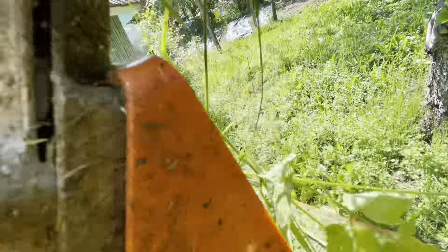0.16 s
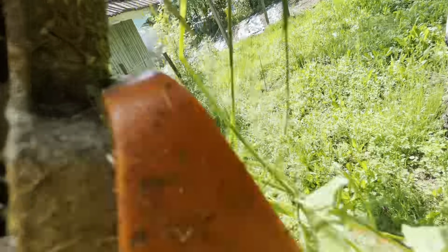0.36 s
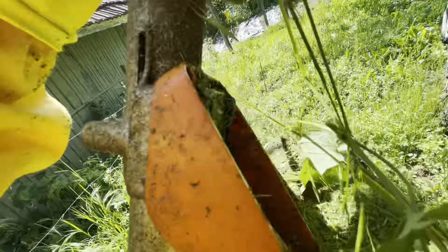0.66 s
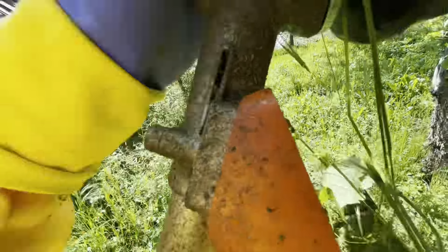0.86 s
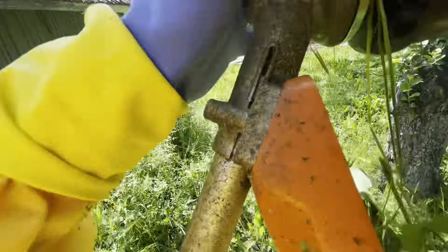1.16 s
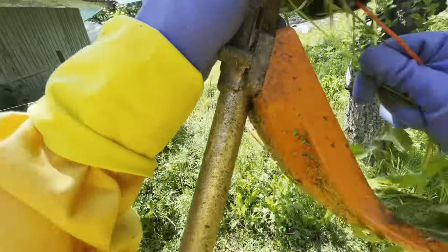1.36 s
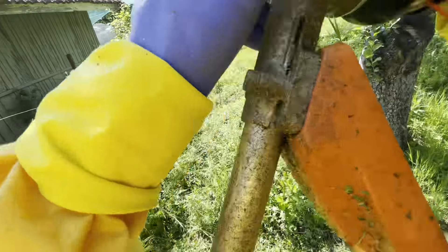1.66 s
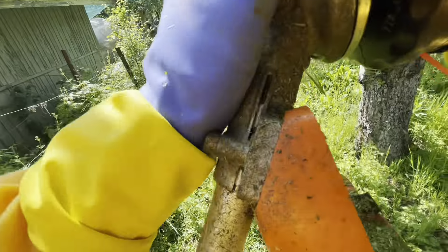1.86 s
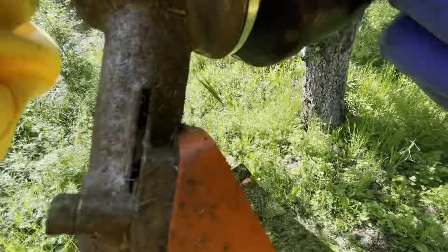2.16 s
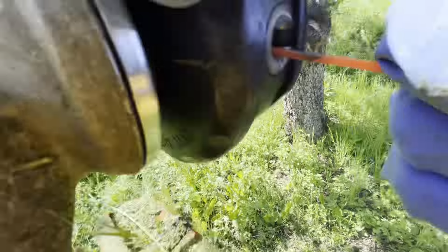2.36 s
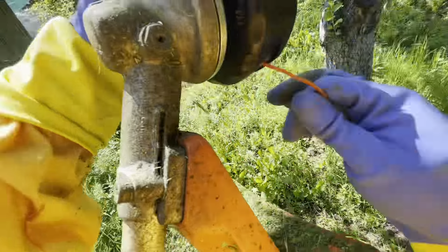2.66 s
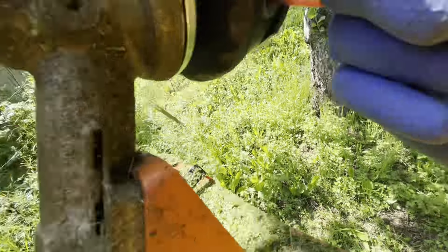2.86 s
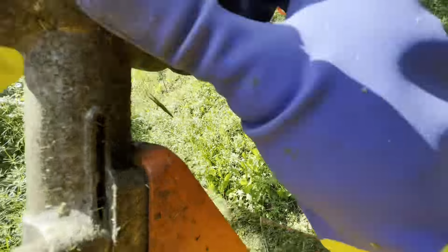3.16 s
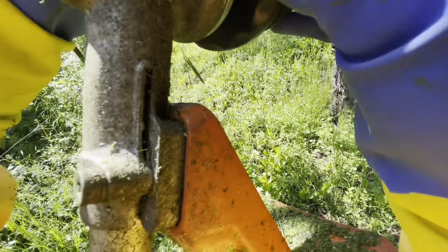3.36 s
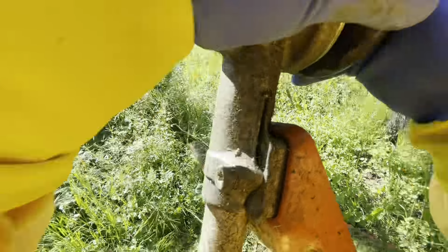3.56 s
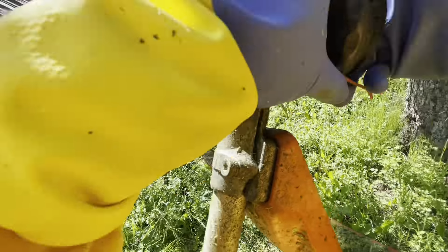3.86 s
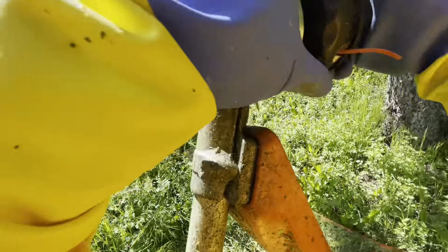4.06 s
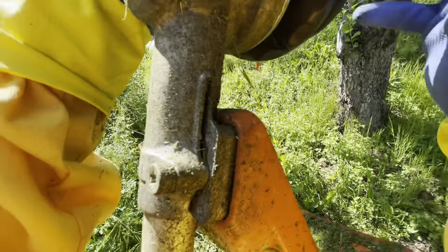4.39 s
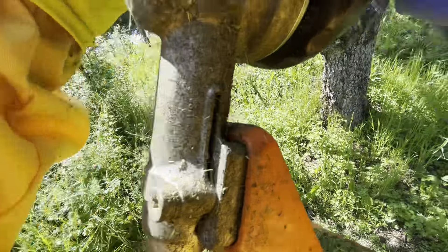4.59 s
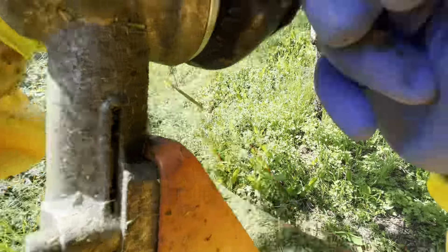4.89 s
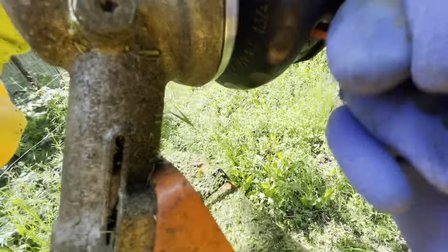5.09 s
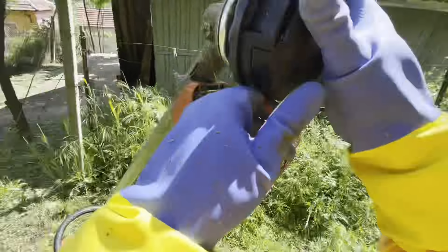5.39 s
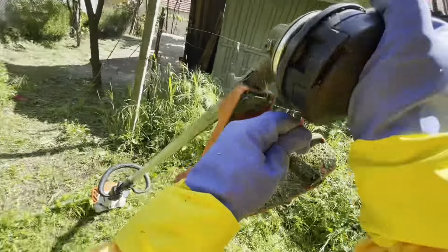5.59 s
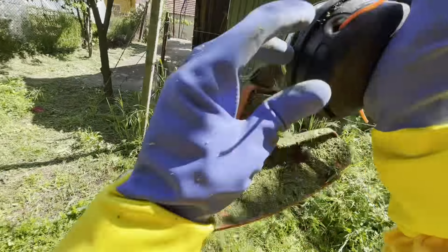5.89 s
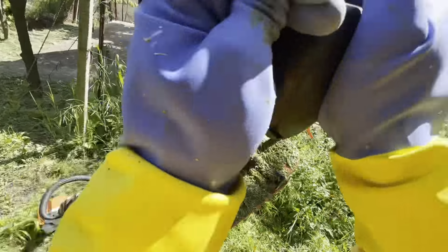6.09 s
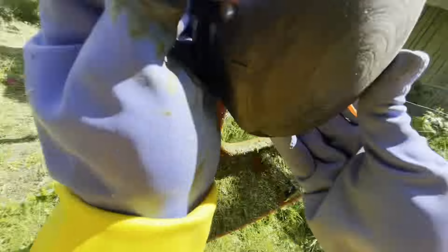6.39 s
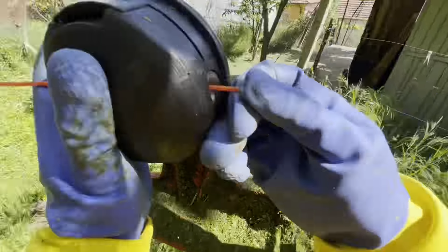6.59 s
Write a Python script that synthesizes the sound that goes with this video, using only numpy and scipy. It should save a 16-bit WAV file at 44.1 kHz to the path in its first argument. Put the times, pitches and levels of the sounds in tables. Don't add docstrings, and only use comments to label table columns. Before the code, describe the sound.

A bee buzzes continuously against the cloth of a suit, rough and raspy up close, while rubber gloves snap and tick in a quiet garden.

```python
import sys
import numpy as np
from scipy import signal
from scipy.fft import rfft, irfft, next_fast_len
from scipy.io import wavfile
from scipy.ndimage import uniform_filter1d

SR = 44100
rng = np.random.default_rng(int(sys.argv[2]) if len(sys.argv) > 2 else 0)


def transcribe(u):
    v = np.clip(np.atleast_2d(u).T, -1, 1)
    q = np.round(v * 32767).astype(np.int16)
    wavfile.write(sys.argv[1], SR, q)


def how_loud(loudness_db):
    steps = np.asarray(loudness_db, float) / 20
    return 10 ** steps


N = 297145

# freq_hz, density_db
HISS_SPECTRUM = [(30, 14), (70, 12), (120, 8), (200, -8), (1000, -8), (3000, -7), (4200, -3), (5200, -5),
                 (8000, -4), (10000, -2), (13000, 0), (15000, -1), (15850, -3), (16000, -45)]
# start_s, end_s, level_db
SLEEVE_RUSTLES = [(-.1, .22, -63), (.6, .75, -58), (.9, 1.38, -63), (1.62, 2.02, -63), (2.15, 2.62, -62.5),
                  (2.82, 3.08, -63), (3.3, 3.68, -62.5), (3.97, 4.03, -63), (4.45, 4.55, -64),
                  (5.0, 5.26, -62), (5.59, 5.65, -62), (5.83, 5.95, -62), (6.2, 6.9, -60)]
# start_s, end_s, level_db
INSECT_SONGS = [
    (.55, 1.15, -71),
    (1.25, 1.8, -72.5),
    (2.05, 3.05, -76),
    (3.45, 5.1, -73.5),
    (5.35, 5.85, -67.5),
    (5.85, 6.66, -64.5),
]
# start_s, peak_db, ring_hz, t60_s
HAND_BUMPS = [(6.6, -37, 1138, .1), (6.606, -38, 1380, .08), (6.612, -39, 2257, .1),
              (6.622, -39, 1180, .07), (6.635, -39, 1300, .08), (6.65, -40, 1900, .06),
              (6.686, -43, 6000, .02), (6.692, -31, 2070, .05), (6.696, -33, 2400, .04),
              (6.693, -36, 1503, .04), (6.694, -41, 4800, .02), (6.696, -43, 6600, .02),
              (6.695, -29, 417, .034), (6.699, -31, 930, .05), (6.704, -35, 430, .04)]
# start_s, peak_db, centre_hz, body_db, left_minus_right_db
GLOVE_SNAPS = [
    (1.7729, -18.5, 9275, -9, -3),
    (1.8658, -20.5, 8840, -12, -4),
    (3.5845, -19, 10500, -4, 0),
    (3.8164, -17, 9680, -4, -3.5),
    (4.0081, -17.5, 9690, -3, -3.5),
]
# start_s, peak_db, centre_hz, left_minus_right_db
RUBBER_CRACKLE = [(0.429, -38.5, 5930, 19), (0.6597, -33, 9000, 7), (0.6882, -47, 7520, -32.5),
                  (0.969, -32, 8650, 8), (0.9753, -26, 10800, -2.5), (1.0257, -27.5, 10500, 9.5),
                  (1.068, -44.5, 10400, -25.5), (1.073, -25, 11300, 7.5), (1.119, -25.5, 6800, -2),
                  (1.1485, -35.5, 9370, -12.5), (1.1508, -26.5, 10600, 3)]
# start_s, peak_db, centre_hz
SIDE_TICKS = [(0.045, -44, 6140), (0.631, -37, 12300), (2.4, -38, 6270), (3.3631, -48.5, 6140),
              (5.187, -35.5, 12300), (5.3484, -55, 11150), (5.3623, -37.5, 10500), (5.616, -36, 11500),
              (5.653, -46, 12200), (5.6994, -35, 11500), (6.5182, -39, 12100), (1.099, -60, 10460),
              (2.3303, -42, 6555), (2.381, -36.5, 6450), (2.432, -31, 8600), (3.008, -43, 6800),
              (3.0109, -33, 7900), (3.276, -36, 11800), (4.5359, -42, 7850), (4.713, -35, 6570),
              (5.026, -35.5, 6460), (5.0643, -40.5, 6700), (5.106, -32, 6500), (6.207, -35.5, 12100),
              (6.368, -38, 12370)]
# start_s, peak_db, centre_hz
GLOVE_SLIPS = [
    (1.7677, -35, 9300),
    (1.8625, -35, 9100),
    (3.5885, -37, 8500),
]
# time_s, beat_hz
WING_BEAT = [(0, 255.7), (.11, 255.9), (.3, 266), (.56, 237.3), (.8, 255), (1.3, 244.8), (1.58, 263.6),
             (1.95, 258.4), (2.25, 248.7), (2.58, 255.9), (2.95, 262.2), (3.24, 241.3), (3.45, 256.4),
             (4.2, 250.2), (4.4, 256), (5.4, 246.3), (5.68, 250.2), (6.74, 252.3)]
# time_s, drop_hz
BEAT_FALTERS = [(1.122, 7), (1.642, 11.1), (1.822, 15.6), (2.078, 7.3), (2.392, 9.1), (2.681, 7.6),
                (3.202, 5.2), (3.499, 5.8), (3.688, 15.3), (3.879, 8.7), (4.241, 4.97), (4.368, 3.85),
                (4.501, 5.1), (4.672, 10.8), (4.868, 5.2), (5.031, 5.4), (5.172, 5.7), (5.76, 7.1),
                (5.85, 8), (5.93, 3), (6.05, 3.5), (6.11, 5), (6.17, 9), (6.352, 10), (6.41, 3), (6.47, 9),
                (6.56, 6), (6.63, 4.1), (6.7, 2.6)]
# multiple, level_db
WING_TONES = [(2, 7.5), (3, 1.5), (4, 5), (5, 3), (6, -3.5), (7, -0.5)]
# time_s, level_db, left_minus_right_db
BEE_FACING = [(0, -59.5, -1), (.3, -51.5, -3), (.6, -46.5, -8), (.9, -52, -8), (1.35, -56, 5),
              (1.55, -59, 10), (1.97, -51.5, -12), (2.21, -57, 3), (2.45, -52.5, 3), (2.68, -61, -3),
              (3.0, -50, 3), (3.2, -60, 2), (4.05, -60.5, 2.5), (4.6, -60, -0.5), (5.05, -54.5, 5),
              (5.8, -64.5, -3.5), (6.25, -53.5, 4), (6.74, -57.5, 0)]
# time_s, slap_brightness_db, left_minus_right_db
CLOTH_PRESS = [(0, -46, 0), (.4, -47, 0.5), (.62, -49.5, -1), (1.8, -50, 1.5), (2.1, -50, -0.5),
               (3.1, -48.5, 2), (5.2, -49, 0.5), (5.44, -47, 5), (6.5, -45.5, 3.5), (6.74, -43, 5.5)]
# time_s, slack_share
CLOTH_SLACK = [(0, 0), (.45, 0), (.55, 0.05), (5.2, 0.05), (5.4, 0.95), (6.74, 0.95)]
# centre_hz, width_hz, level_db
DULL_MODES = [(412, 75.6, 1), (674, 51, 0), (1004, 360, -7.5)]
# centre_hz, width_hz, level_db
MIDDLE_MODES = [(1246, 450, -0.5), (1377, 226, 6)]
# centre_hz, width_hz, level_db
BRIGHT_MODES_TAUT = [(1755, 160, -3.5), (1974, 87, 6), (2268, 150, 6), (2510, 144, -4), (3120, 220, -5),
                     (3610, 170, -13), (4630, 310, -24.5)]
# centre_hz, width_hz, level_db
BRIGHT_MODES_SLACK = [(1650, 220, -18), (1880, 88, 5), (2140, 120, 11), (2370, 260, -1), (2660, 60, -4),
                      (3250, 130, -9), (3470, 120, -14), (4070, 130, -21)]
# start_s, end_s, level_db
SEAM_PINGS = [
    (-.1, .4, -67),
    (.4, .7, -63.5),
    (.7, 2.02, -69),
    (2.14, 2.8, -68),
    (2.8, 3.25, -65.5),
    (3.25, 4.9, -71),
    (4.9, 5.28, -67),
    (6.66, 6.9, -76),
]
# freq_hz, half_lead_x2_rad
PORT_LEAD = [(0, 0), (500, .3), (1500, .45), (2000, .8), (2900, .8), (3600, 2.4), (4500, 3.1), (6200, 2.1),
             (9000, .9), (13000, 1.5)]
# freq_hz, taut_share, slack_share
GATE_SHARES = [(3200, 0, 0), (3800, .25, .02), (4600, .6, .1), (5400, .15, .4), (6300, .03, .15),
               (7500, .3, .2), (8800, .4, .62), (10800, .08, .5), (11800, .02, .03), (13200, .12, .1),
               (14500, .03, .02), (15600, .2, .15)]


def evened(x):
    return x / np.sqrt(np.mean(x ** 2) + 1e-20)


def curves(rows):
    s, *columns = np.transpose(rows)
    return [np.interp(np.arange(N) / SR, s, c) for c in columns]


def read(points, hz):
    f, value = np.transpose(points)
    return np.interp(np.log(hz + 1), np.log(f + 1), value)


def ring(x, hz, width_hz):
    pole = np.exp((2j * np.pi * hz - np.pi * width_hz) / SR)
    return 2 * signal.lfilter([1 - abs(pole)], [1, -pole], x).real


def dulled(x, hz):
    return signal.sosfilt(signal.butter(3, hz, fs=SR, output="sos"), x)


def thinned(x, hz, order=3):
    return signal.sosfilt(signal.butter(order, hz, "high", fs=SR, output="sos"), x)


def drift(size):
    return evened(uniform_filter1d(uniform_filter1d(rng.standard_normal(N), size), size))


def spells(rows, edge_s, rest_db):
    t = np.arange(N) / SR
    power = how_loud(2 * rest_db)
    for start_s, end_s, db in rows:
        swell = (np.tanh((t - start_s) / edge_s) - np.tanh((t - end_s) / edge_s)) / 2
        power = power + how_loud(2 * db) * swell
    return np.sqrt(power)


def add(mix, s, sound):
    part = mix[:, round(s * SR):][:, :sound.shape[1]]
    part += sound[:, :part.shape[1]]


def ports(x, pan_db):
    size = next_fast_len(len(x))
    half = np.exp(.5j * read(PORT_LEAD, np.fft.rfftfreq(size, 1 / SR)))
    pair = irfft(rfft(x, size) * np.array([half, 1 / half]), size)[:, :len(x)]
    return pair * how_loud(np.array([pan_db / 2, -pan_db / 2]).reshape(2, -1))


def garden_hiss():
    frames, hz = N // 128 + 5, np.fft.rfftfreq(512, 1 / SR)
    a, b, c, d, patches = rng.standard_normal((frames, 257, 5)).T
    patches = evened(uniform_filter1d(uniform_filter1d(patches, 10, 0), 25, 1))
    left = a + 1j * b
    right = c + 1j * d - 0.16 * left
    z = np.array([left, right]) * how_loud(read(HISS_SPECTRUM, hz)[:, None] + 1.7 * patches)
    hiss = evened(signal.istft(z, nperseg=512, noverlap=384)[1][:, :N])
    return how_loud(0.5) * hiss * spells(SLEEVE_RUSTLES, edge_s=0.061, rest_db=-60)


def far_insect():
    whistle = ring(ring(rng.standard_normal(N), 12260, 300), 12260, 450)
    fuzz_db = 2.5 * drift(size=200)
    throb_hz = 80 + 8 * drift(size=2000)
    throb_db = 4.5 * np.sin(2 * np.pi * np.cumsum(throb_hz) / SR)
    song = evened(whistle * how_loud(fuzz_db + throb_db))
    song = how_loud(6.5) * spells(INSECT_SONGS, edge_s=0.036, rest_db=-94) * song
    faint = ring(ring(rng.standard_normal(N), 10450, 110), 10450, 180)
    return ports(song + how_loud(-76) * evened(faint), 4.5)


def bumps():
    out, t = np.zeros((2, N)), np.arange(6000) / SR
    for s, db, hz, t60_s in HAND_BUMPS:
        blow = how_loud(-60 * t / t60_s) * np.sin(2 * np.pi * hz * t) * (1 - np.exp(-t / 0.000083))
        scuff = 2.0 * np.exp(-t / 0.0023) * ring(rng.standard_normal(6000), 0.2 * hz, 1500)
        push = 0.068 * np.exp(-t / 0.0097) * np.sin(2 * np.pi * 45 * t)
        add(out, s, how_loud(db) * ports(blow + scuff + push, 8.2))
    return out


def gloves():
    out, t = np.zeros((2, N)), np.arange(2000) / SR
    crackle_body_db, tick_body_db, tick_pan_db = 1, 2, 10
    rows = list(GLOVE_SNAPS)
    rows += [(s, db, hz, crackle_body_db, pan_db) for s, db, hz, pan_db in RUBBER_CRACKLE]
    rows += [(*tick, tick_body_db, tick_pan_db) for tick in list(SIDE_TICKS) + list(GLOVE_SLIPS)]
    rise_or_fall_s = np.where(t < .0007, .0002, .0006)
    tail = .05 * (t > .0011) * np.exp(-t / .007)
    shape = np.exp(-((t - .0007) / rise_or_fall_s) ** 2) + tail
    clean_break = 3.0 * (np.arange(2000) == 36)
    push = .04 * np.exp(-t / .006) * np.sin(2 * np.pi * 70 * t)
    for s, db, hz, body_db, pan_db in rows:
        crackle = rng.choice([-1., 1.], 2000)
        burst = np.diff(shape * (crackle + clean_break), prepend=0)
        bright = ring(ring(ring(burst, hz, 4000), hz, 4500), hz, 7000)
        bright += 2.2 * ring(ring(burst, 4600, 3000), 4800, 3500)
        body = ring(ring(np.roll(burst, 26), 1900, 1500), 3500, 2800)
        snap = bright / (0.38 * np.linalg.norm(bright)) + how_loud(body_db) * body / abs(body).max() + push
        add(out, s - .0005, how_loud(db) * ports(snap, pan_db))
    return out


def slackness():
    return np.clip(curves(CLOTH_SLACK)[0], 0, 1)


def modes(x, table, sign):
    slack = slackness()
    out = np.zeros(N)
    for k, (hz, width_hz, db) in enumerate(table):
        both = ring(x * (1 - slack), hz, width_hz) + ring(x * slack, 0.988 * hz, width_hz)
        out += sign ** k * how_loud(db) * both
    return evened(out)


def bright_rings(x):
    slack = slackness()
    out = np.zeros(N)
    for table, share in ((BRIGHT_MODES_TAUT, 1 - slack), (BRIGHT_MODES_SLACK, slack)):
        for hz, width_hz, db in table:
            out += how_loud(db) * ring(x * share, hz, width_hz)
    return evened(out)


def hollow(x):
    t = np.arange(800) / SR
    taps = rng.standard_normal((2, 800)) * np.exp(-t / 0.0049) * (t > .0008)
    taps /= np.linalg.norm(taps, axis=1, keepdims=True)
    return how_loud(-8.5) * signal.oaconvolve(x[None], taps, axes=1)[:, :N]


def wing_hz():
    t = np.arange(N) / SR
    hz = curves(WING_BEAT)[0]
    falter_s, pickup_s = .015, .05
    for s, drop_hz in BEAT_FALTERS:
        hz = hz - drop_hz * np.exp(-((t - s) / np.where(t < s, falter_s, pickup_s)) ** 2)
    return hz


def slaps(turns, sway, place, sharp, late, scatter, steady):
    chance = rng.standard_normal((len(sway), 2))
    stroke = np.arange(len(sway)) + place
    samples = np.arange(N)
    at = np.interp(stroke + late * np.sin(sway) + scatter * chance[:, 0], turns, samples)
    force = np.exp(sharp * np.cos(sway) + 0.072 * chance[:, 1])
    usual_at = np.interp(stroke, turns, samples)
    usual = np.full_like(force, (1 - steady) * force.mean())
    out = np.zeros(N + 1)
    for where, size in ((at, -force), (usual_at, usual)):
        whole = where.astype(int)
        out += np.bincount(whole, size * (1 - where % 1), N + 1)
        out += np.bincount(whole + 1, size * (where % 1), N + 1)
    out[-3:] = 0
    return out[:N]


def wing_whirr(turns, level_db):
    noise = (.3 + np.exp(-((turns - .55) % 1) / .2)) * rng.standard_normal((2, N))
    whirr = ring(noise, 2500, 880) + 1.8 * ring(noise, 3320, 1600)
    whirr += 2.7 * ring(noise, 270, 120)
    return how_loud(level_db) * evened(dulled(whirr, 5060))


def seam_pings(turns, sway):
    hits = how_loud(1.5 * drift(size=1500)) * slaps(turns, sway, .56, 1.15, 0.04, .01, 0.99)
    hits = hits + .25 * np.roll(hits, 86)
    ping = evened(ring(ring(hits, 6120, 800), 6050, 1600))
    return how_loud(8.0) * spells(SEAM_PINGS, edge_s=0.11, rest_db=-103) * ping


def crisp_slaps(turns, sway, bright_db):
    taps = slaps(turns, sway, .54, 0.55, 0.025, 0.004, 1.0)
    spike = ring(ring(np.diff(taps, prepend=0), 2200, 2600), 2600, 3600)
    brushed = taps + 0.45 * np.roll(taps, 74)
    sound = bright_rings(brushed) + how_loud(-13) * evened(spike)
    return how_loud(bright_db + 1.5) * dulled(thinned(sound, 1230), 5700)


def soft_slaps(turns, sway, bright_db):
    dull = slaps(turns, sway - .3, .6, 1.1, 0.0012, 0.045, 0.0021)
    full = slaps(turns, sway - 2.5, 0.555, 1.9, 0.041, 0.0083, 0.067)
    full_db = -6.5 + 1.25 * (bright_db + 47.5)
    return how_loud(full_db) * modes(full, MIDDLE_MODES, -1.07) - how_loud(-7.5) * modes(dull, DULL_MODES, -0.76)


def wing_tones(turns, low_db):
    out = np.zeros(N)
    for k, db in WING_TONES:
        swell_db = (k == 2) * 0.28 * (low_db + 38.5)
        out -= how_loud(db + swell_db) * np.sin(2 * np.pi * k * (turns - .84))
    return how_loud(-11) * out


def lowest_tone(turns, low_db, pan_db):
    wander = .6 * drift(size=8000)
    phase = 2 * np.pi * turns + np.array([wander, -wander]) + 2.0
    return how_loud(low_db + 5.5 + np.array([pan_db, -pan_db]) / 2) * np.sin(phase)


def bee():
    (bright_db, pan_db), (low_db, low_pan_db), hum_db = curves(CLOTH_PRESS), curves(BEE_FACING), -40.5
    unsteady = 1 + .009 * drift(size=350) + .007 * drift(size=1600)
    turns = np.cumsum(wing_hz() * unsteady) / SR
    sway = 2 * np.pi * np.cumsum(.33 + .11 * rng.standard_normal(1800))
    hum = how_loud(hum_db) * (wing_tones(turns, low_db) + soft_slaps(turns, sway, bright_db))
    sound = ports(hum + crisp_slaps(turns, sway, bright_db), pan_db)
    sound = thinned(sound, 230, order=4)
    sound = sound + hollow(sound.mean(0))
    sound += ports(seam_pings(turns, sway), pan_db + 8.0)
    sound += lowest_tone(turns, low_db, low_pan_db)
    return sound + wing_whirr(turns, hum_db - 14)


def scene():
    return garden_hiss() + far_insect() + bumps() + gloves() + bee()


def wind_filter(x):
    return thinned(x, 215, order=6) + .04 * x


def gain_control(x):
    peak_db = 20 * np.log10(abs(x).max(0) + 1e-9)
    fall_db = np.arange(N) * 710.0 / SR
    over_db = np.maximum(np.maximum.accumulate(peak_db + fall_db) - fall_db + 28.0, 0)
    duck_db = .5 * np.roll(uniform_filter1d(over_db, 40), 100)
    return x / how_loud(duck_db)


def gate(x):
    slackens_s, thin_hz, thin_share = 5.27, 3000, .75
    hz, t, z = signal.stft([x[0] + x[1], x[0] - x[1]], SR, "cosine", nperseg=2048, noverlap=1024)
    power = abs(z) ** 2
    share = power[0, :1024].reshape(64, 16, -1).mean(1) / power[0].mean(0) ** .32
    share = uniform_filter1d(uniform_filter1d(np.log(share + 1e-30), size=3, axis=0), size=2, axis=1)
    rank = (share - uniform_filter1d(share, size=90, axis=1)).argsort(1).argsort(1) / share.shape[1]
    f, taut, slack = np.transpose(GATE_SHARES)
    taut_limit, slack_limit = [np.interp(hz[8::16], f, c)[:, None] for c in (taut, slack)]
    limit = np.where(t < slackens_s, taut_limit, slack_limit)
    treble = power[0, 300:700].mean(0)
    sudden = treble > 3.5 * np.median(treble)
    z[0, :1024] *= np.repeat((rank >= limit) | sudden, 16, axis=0)
    strong = power > thin_share * uniform_filter1d(power, size=24, axis=1)
    z *= strong | (hz < thin_hz)[:, None] | sudden
    mid, side = signal.istft(z, SR, "cosine", nperseg=2048, noverlap=1024)[1][:, :N]
    return np.array([mid + side, mid - side]) / 2


def roll_off(x):
    return signal.sosfilt(signal.butter(12, 16670, fs=SR, output="sos"), x)


def record(dry):
    top = signal.firwin(801, 15930, window=("kaiser", 9), fs=SR)
    level = gain_control(wind_filter(dry))
    mix = gate(signal.oaconvolve(level, top[None], "same"))
    return roll_off(mix)


dry = scene()
out = record(dry)
transcribe(out)
```